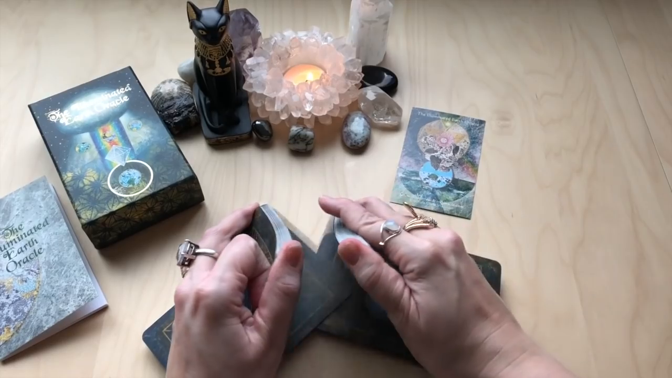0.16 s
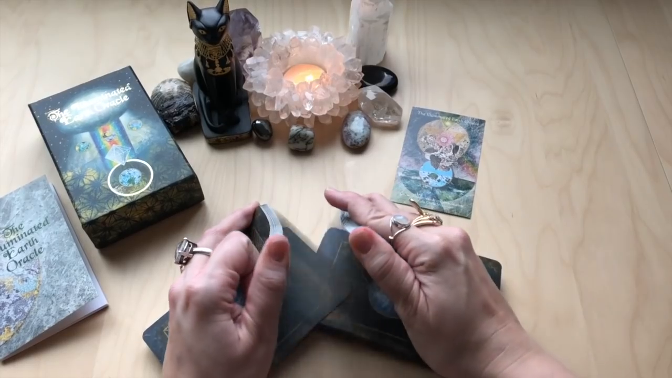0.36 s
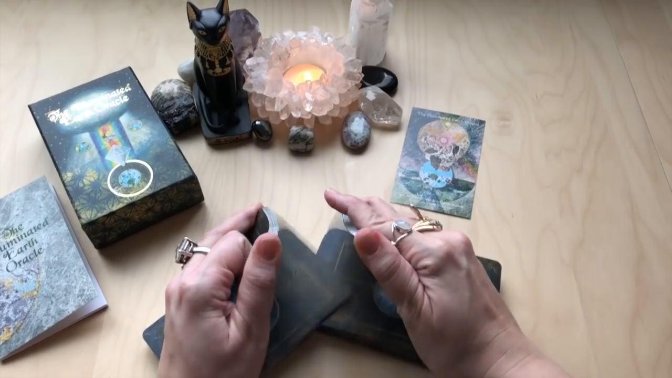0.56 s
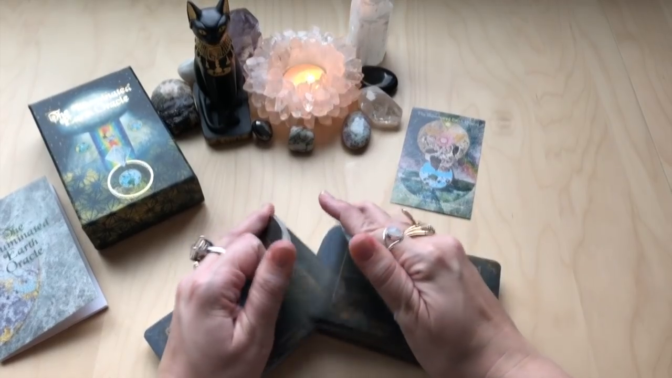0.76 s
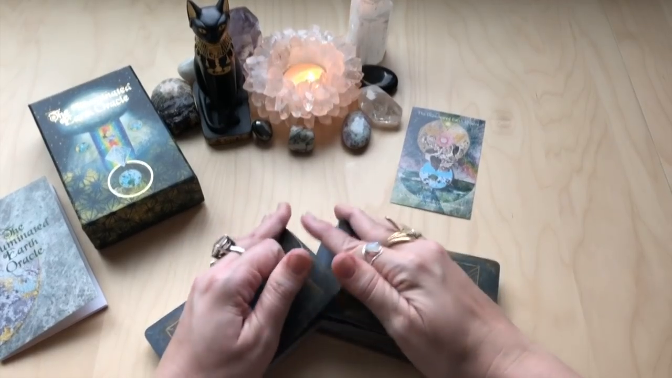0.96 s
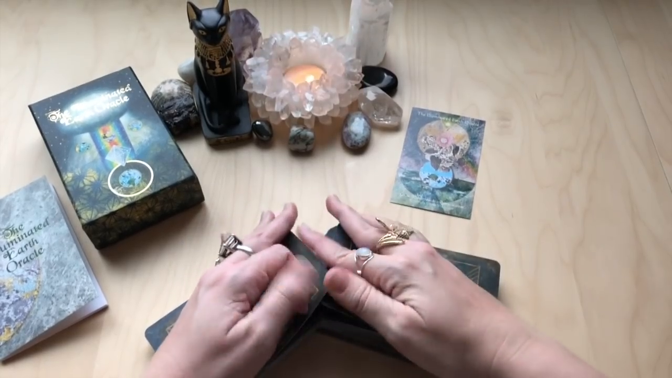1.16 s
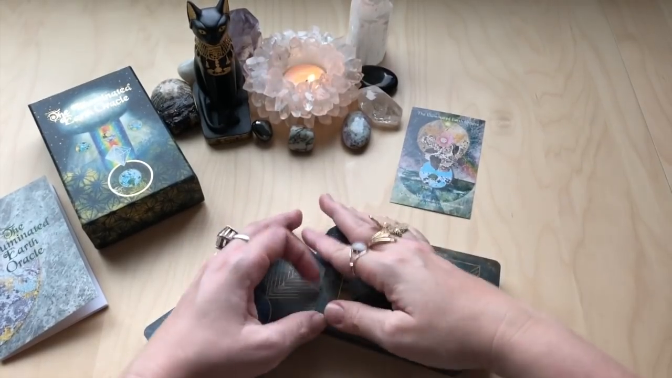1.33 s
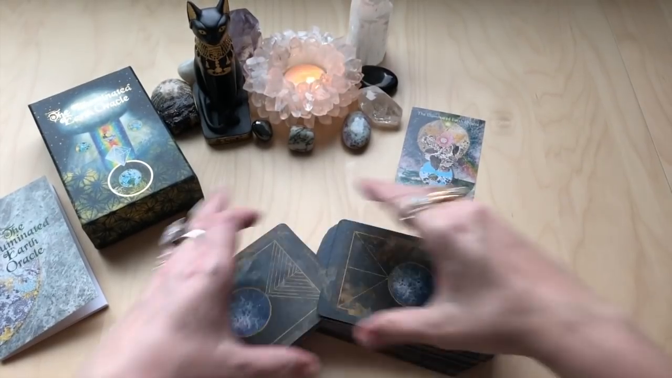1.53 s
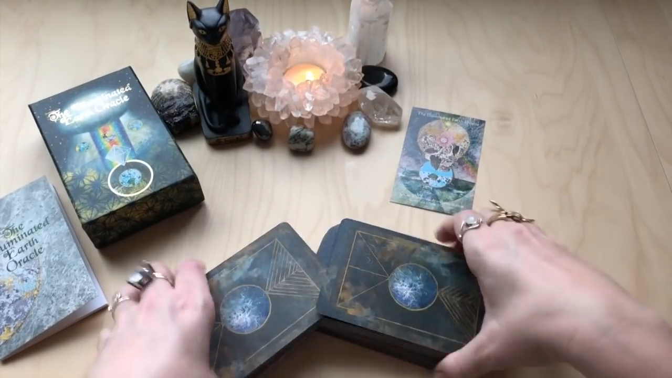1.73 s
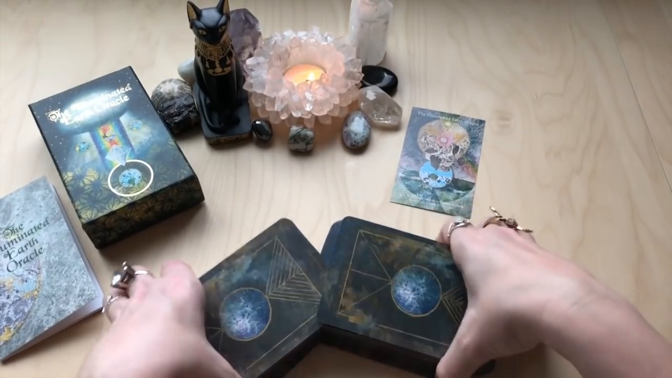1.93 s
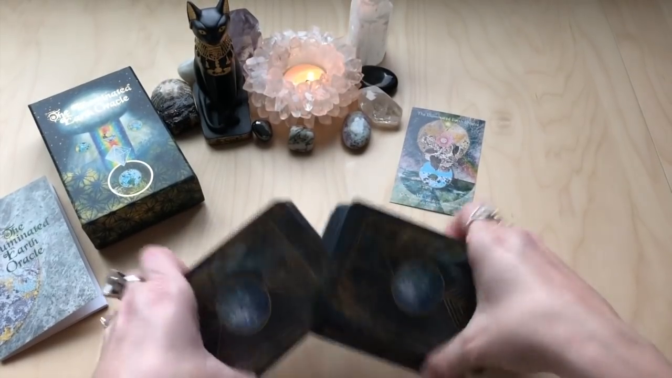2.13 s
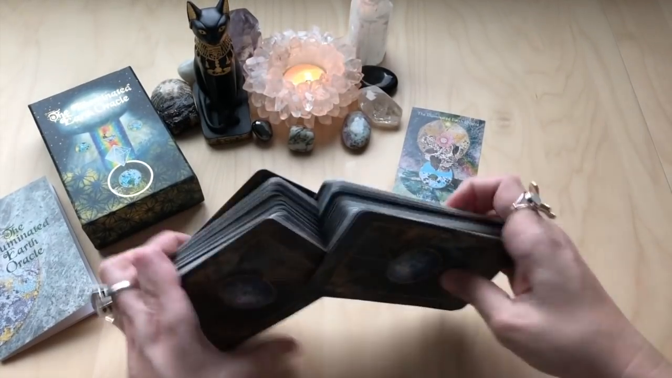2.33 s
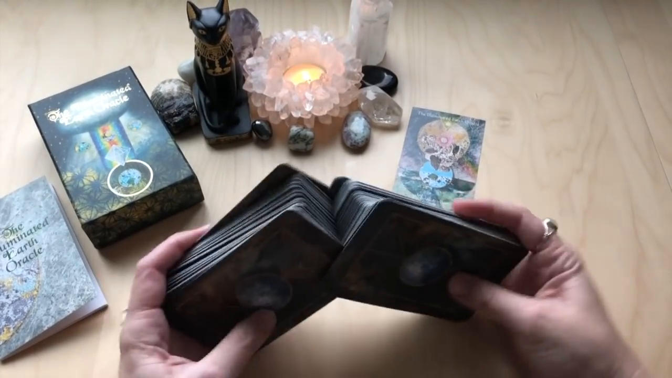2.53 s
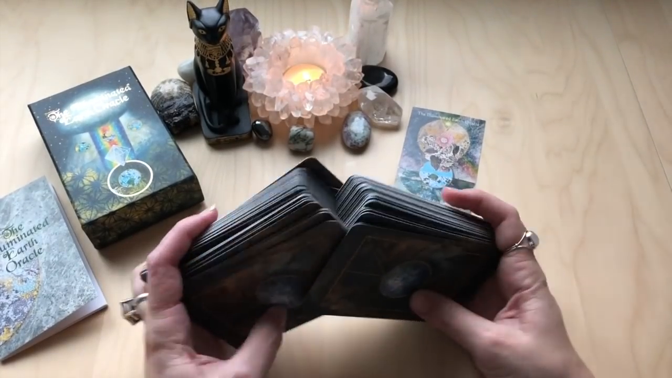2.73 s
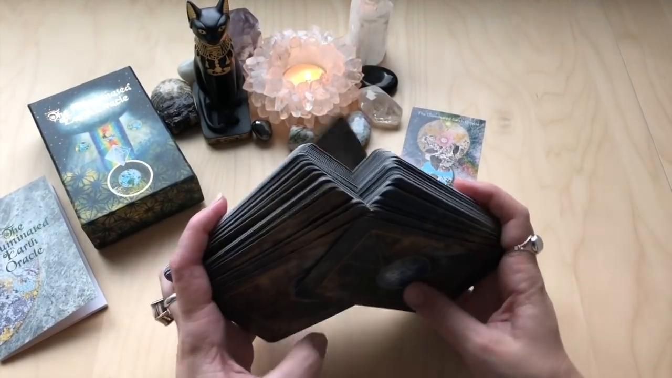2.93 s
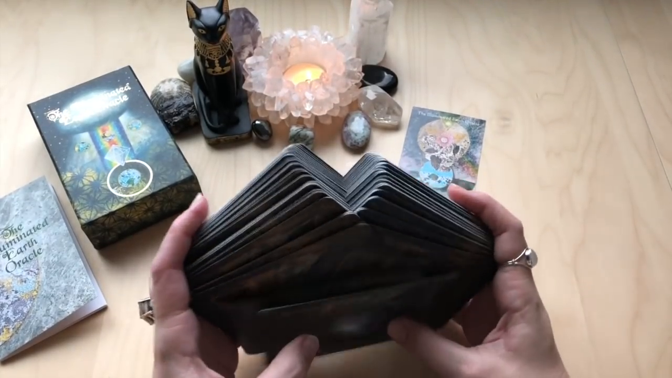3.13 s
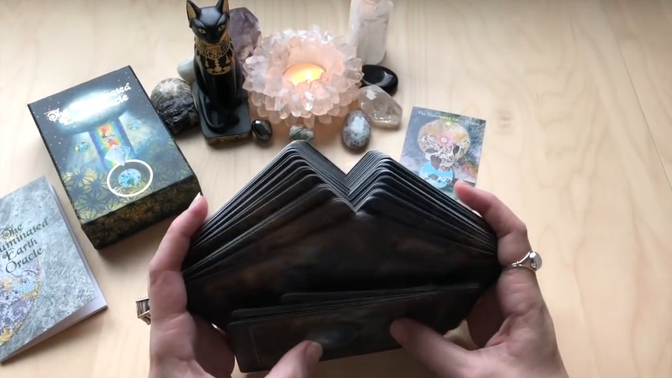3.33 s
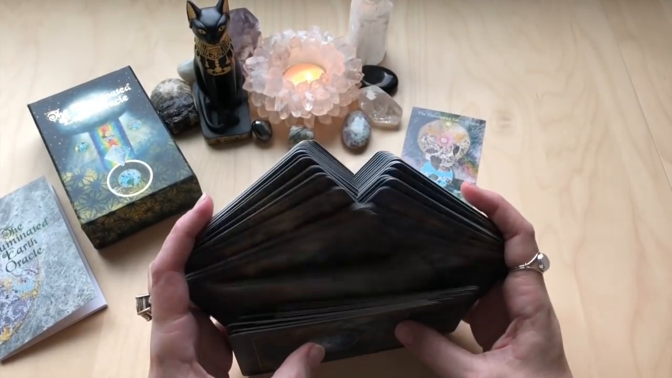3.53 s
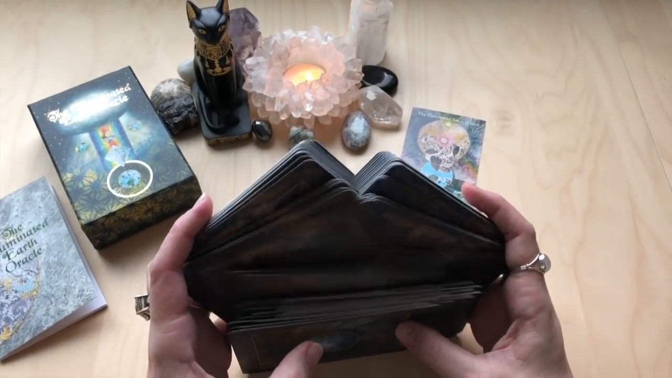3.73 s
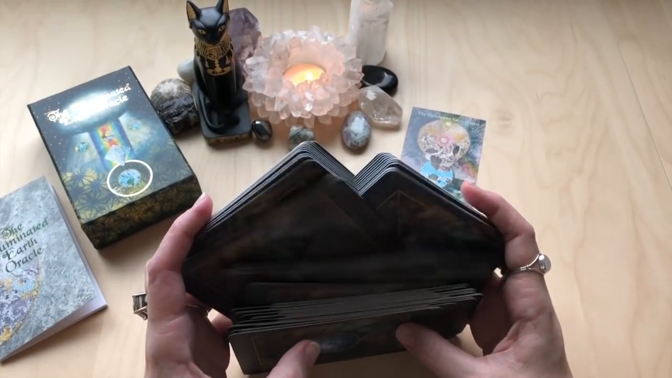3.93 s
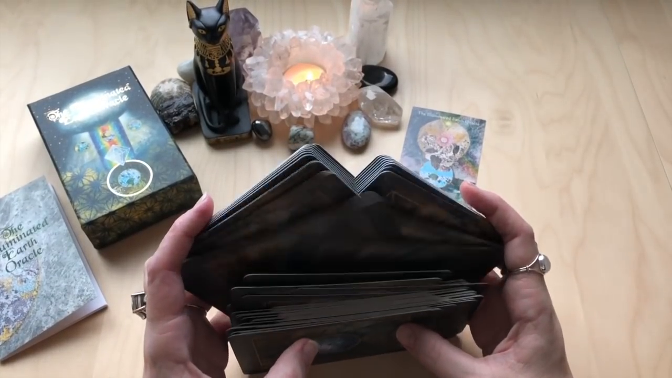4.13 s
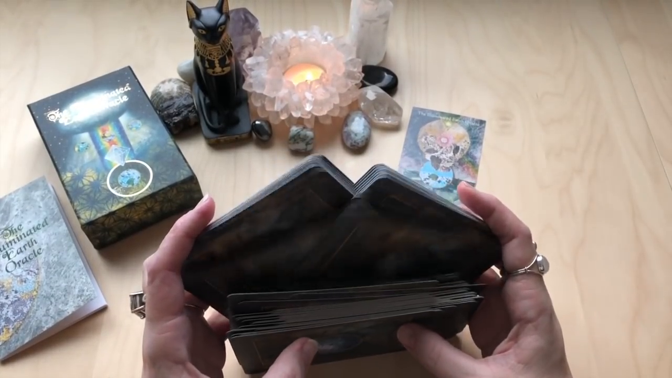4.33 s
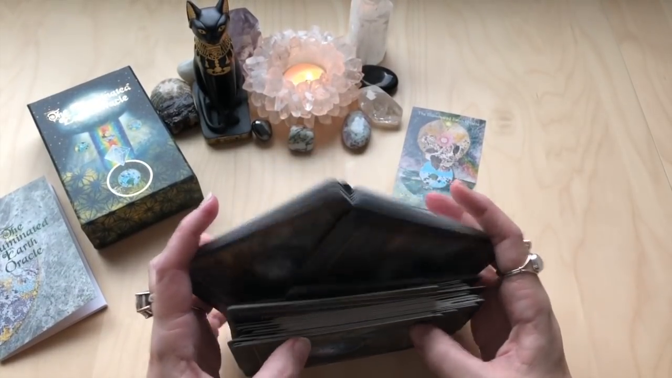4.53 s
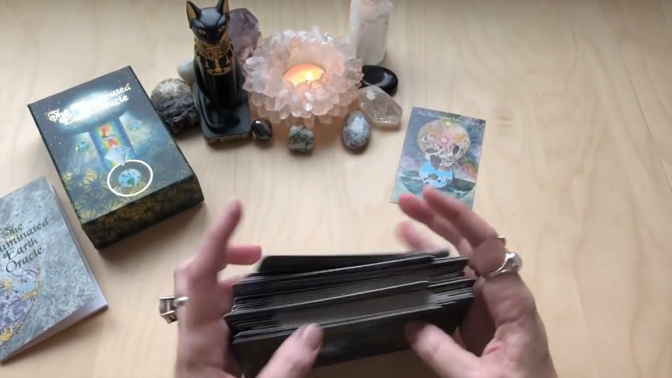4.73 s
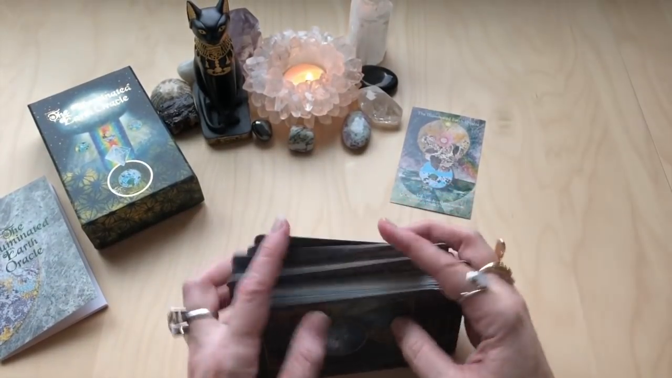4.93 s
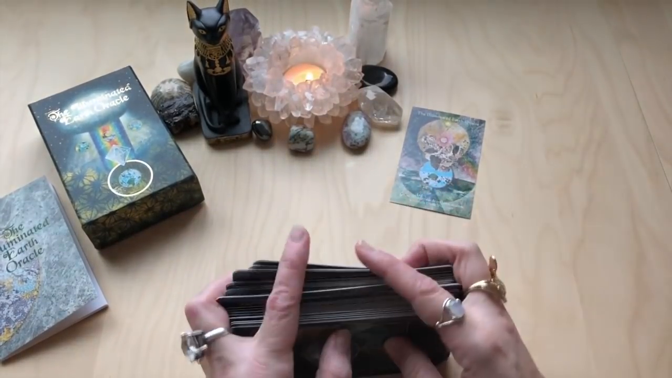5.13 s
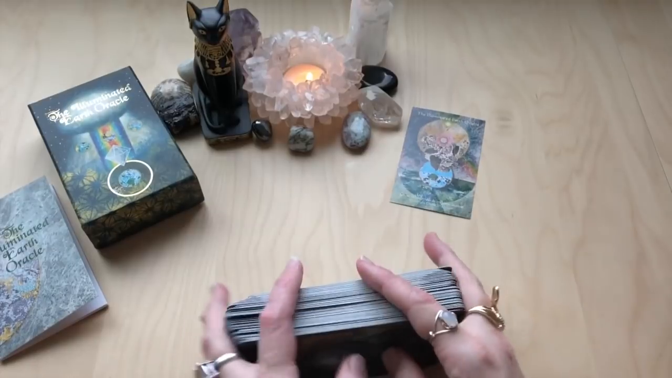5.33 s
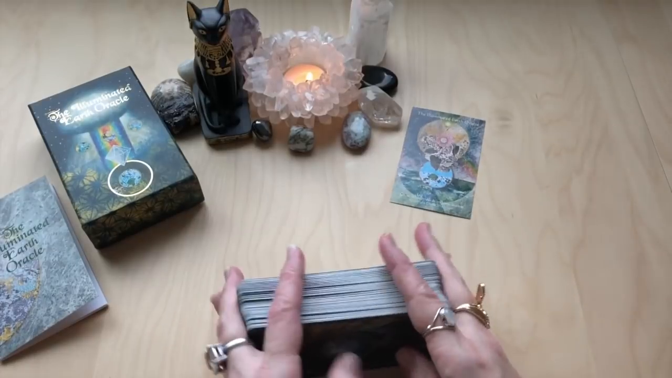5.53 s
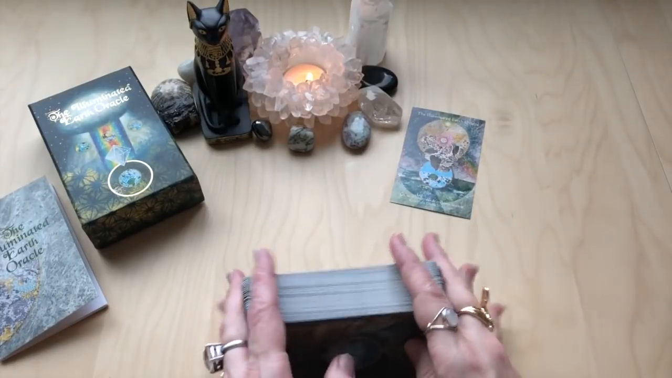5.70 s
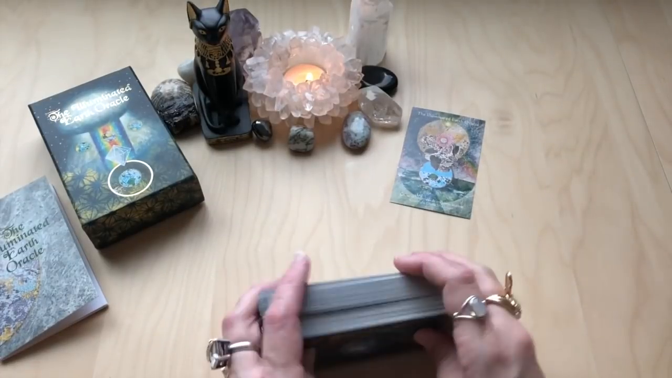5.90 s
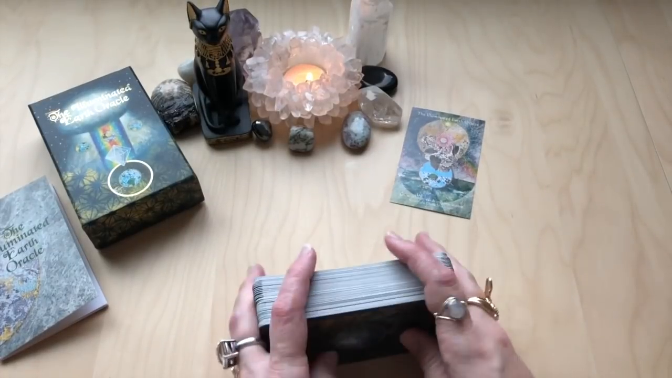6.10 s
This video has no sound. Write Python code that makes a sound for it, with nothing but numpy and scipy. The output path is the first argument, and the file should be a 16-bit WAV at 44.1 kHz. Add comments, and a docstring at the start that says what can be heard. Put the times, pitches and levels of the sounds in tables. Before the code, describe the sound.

Heard close in a quiet room, thumbs riffle two halves of a stiff card deck on a wooden table, a rapid crackle of sharp snaps growing louder and brighter. It stops; faint taps and one dull thump follow. Then the bent cards cascade together in a looser, duller flutter of slaps with rubbing slides, a few last slaps, soft scuffs as the deck is squared, and a final tap.

```python
"""Riffling a deck of cards

In a quiet room, heard from close by, the thumbs riffle two halves of a stiff deck together on a wooden table.
The hands lift the pack, the cards cascade and slap into place, and the deck is squared.
Each card edge cracks for a few milliseconds: short noise bursts ring through card and table resonances.
Longer shaped noise makes the hiss of sliding faces and the rumble of the table, and the room rings on."""
import sys
import numpy as np
from scipy import signal
from scipy.fft import rfft, irfft
from scipy.io import wavfile
from scipy.ndimage import uniform_filter1d

SR = 44100
rng = np.random.default_rng(int(sys.argv[2]) if len(sys.argv) > 2 else 0)


def transcribe(u):
    """Save the signal u as a 16-bit wav file named by the first command-line argument.

    u: samples, shape (n,) or (channels, n), limited to [-1, 1]; the rate is SR.
    q: integer samples, one column per channel.
    """
    v = np.clip(np.atleast_2d(u).T, -1, 1)
    q = np.round(v * 32767).astype(np.int16)
    wavfile.write(sys.argv[1], SR, q)


N = 271656  # length of the scene in samples

# Quiet room noise: f/Hz, relative level/dB per Hz
AIR_SPECTRUM = [(18, -27.5), (30, -32), (59, 4), (108, -2.5), (120, 2.5), (208, -10.5), (243, -16.5),
                (341, 1), (467, -19), (505, -3.5), (691, -21), (15500, -60.5)]
# Faint hum: f/Hz, width/Hz, level/dB
HUM_BAND = (243, 13, -69)
# Low rumble of the table top, swelling with handling and booming after knocks:
# t/s, level/dB (before the rumble's own 4.5 dB cut)
RUMBLE_CURVE = [(0, -52), (.93, -37.5), (1.4, -65.5), (1.73, -78), (1.78, -52), (2.39, -69.5), (2.43, -45),
                (2.65, -56.5), (3.15, -68.5), (3.8, -49.5), (4.37, -73), (4.8, -46.5), (5.15, -63),
                (5.28, -51.5), (6.02, -57.5), (6.11, -43)]
# Card faces and fingers sliding: t/s, hiss level/dB, rub level/dB
SLIDE_CURVE = [(0, -54, -54), (.08, -78, -76), (.29, -57.5, -61.5), (1.1, -58, -58), (1.24, -66, -70),
               (1.47, -76.5, -80.5), (1.74, -89.5, -89.5), (1.8, -72, -76), (2.08, -79, -72),
               (2.68, -70, -72), (3.0, -77, -82), (3.36, -56, -46.5), (3.77, -52.5, -44.5),
               (4.05, -57.5, -51.5), (4.38, -60.5, -70), (4.63, -56.5, -46.5), (5.15, -74.5, -60.5),
               (5.35, -70, -62), (5.7, -76, -66), (6.02, -78, -74), (6.16, -64, -57)]
# Single quick slides: middle t/s, length/s, level/dB before the texture loss,
# texture (-1 table rumble, 0 dull rub, 1 scrape, 2 glossy hiss)
QUICK_SLIDES = [(1.311, 0.023, -47, 2), (1.84, 0.04, -58, 1.5), (1.96, .05, -67, 1.4),
                (2.281, .1, -63.5, 2.2), (2.665, 0.09, -63, 2.1), (2.76, .07, -66, 1.1),
                (2.873, 0.11, -58, 2), (3.07, .04, -72, 1.9), (3.432, 0.037, -35, 0.2),
                (3.933, 0.023, -48, 1), (3.985, 0.04, -51, 1.9), (4.296, 0.1, -52, 2.8),
                (4.432, .045, -40, .6), (4.534, 0.011, -48, 2.1), (4.716, 0.12, -48, 2),
                (5.041, 0.043, -55, 0.8), (5.28, 0.08, -42, 0.1), (5.463, 0.1, -52, 2),
                (5.57, .07, -70, 1.3), (5.225, .04, -52, .1), (5.7, 0.08, -51, -.4),
                (5.812, 0.08, -50, -.1), (5.948, 0.05, -53, 1.5)]
# Card corners snapping off the thumbs: t/s, level/dB, brightness/dB (edge treble over crack)
THUMB_SNAPS = [(0.008, -36, 0), (0.035, -46, 6), (0.076, -46.5, 3), (0.1095, -40, -2), (0.1177, -37, 11),
               (0.1436, -34, -2), (0.1549, -34, 5), (0.176, -41, -1), (0.1947, -34, 11),
               (0.2114, -31, -0.5), (0.2561, -20.5, 1.5), (0.271, -35, 9.5), (0.3008, -42, 14),
               (0.3111, -34, 3), (0.3536, -44, 8), (0.3649, -31.5, 9), (0.37, -37, 0), (0.3984, -32.5, 6.5),
               (0.4023, -29, 8), (0.4186, -37, 7), (0.447, -26.5, 15), (0.4587, -34.5, 6),
               (0.4805, -25.5, 15), (0.4863, -31, 10), (0.5212, -23, 23.5), (0.5309, -29, 11),
               (0.5565, -26, 14), (0.5729, -23, 2), (0.6181, -29.5, 3), (0.6277, -26, 9.5), (0.653, -29, 8),
               (0.659, -27, 10.5), (0.7134, -25.5, 18), (0.7474, -30.5, -7), (0.7535, -25, 28),
               (0.7695, -31.5, 5), (0.7846, -25.5, 6), (0.794, -28, 13.5), (0.8129, -22, 3),
               (0.845, -24.5, 19), (0.862, -23, 2), (0.8664, -25.5, 2.5), (0.885, -34, 14),
               (0.9066, -26, -1), (0.9191, -24.5, -1), (0.9492, -25.5, 1), (0.9634, -22.5, 5.5),
               (1.0087, -26, -6), (1.02, -37, 4), (1.0306, -19.5, 5), (1.062, -25.5, 2), (1.101, -40, -8),
               (1.1062, -26.5, -2.5), (1.152, -23, 3.5), (1.1651, -31.5, 6), (1.1731, -24, 6.5),
               (1.296, -33, 22), (1.476, -62, -4), (1.49, -64, -6)]
# Stretches of small stray card ticks: from t/s, to t/s, ticks per second, lowest level/dB
STRAY_TICKS = [(0.097, 1.19, 72, -48.5), (3.251, 3.98, 87.3, -40), (4.58, 4.87, 80, -45)]
# Dull card-body thuds, some alone and some beneath a snap or slap: t/s, card body level/dB
DULL_THUDS = [(0.128, -40.5), (0.1549, -39), (0.1949, -38), (0.251, -42), (0.3009, -39.5), (0.3538, -38.5),
              (0.4715, -38), (0.491, -42), (0.614, -41), (0.643, -39), (0.722, -41), (0.851, -35),
              (0.996, -38), (0.516, -40), (0.5732, -31.5), (0.657, -36), (0.6883, -38), (0.7474, -37.5),
              (0.807, -34.5), (0.8348, -39), (1.019, -36), (1.137, -33.5), (1.152, -30.5), (1.1729, -32.5),
              (3.105, -53), (3.462, -36), (3.816, -25.5), (3.928, -29), (4.0463, -33), (4.0899, -23.5),
              (4.5945, -32.5), (4.8318, -34), (4.948, -36), (4.967, -36.5), (5.16, -54), (5.206, -35.5),
              (5.27, -40)]
# Pack and hands knocking the table: t/s, card body level/dB, crack level/dB, edge treble level/dB,
# table level/dB, contact time/s (halved for the edge)
TABLE_KNOCKS = [(1.745, -65, -66.5, -69, -58.5, 0.0051), (1.76, -59.5, -57.5, -63.5, -49, 0.0042),
                (1.782, -66, -57, -64, -60, 0.004), (1.876, -59, -57, -64, -44.5, 0.0027),
                (1.925, -48, -49, -51, -38, 0.0067), (2.046, -66, -62, -66, -62, 0.003),
                (2.155, -57.5, -56, -61, -61, 0.0044), (2.172, -59, -60, -66, -64, 0.004),
                (2.416, -33.5, -48.5, -50, -37, 0.011), (2.487, -41, -62, -52.5, -47.5, 0.0047),
                (2.623, -55, -56.5, -53.5, -54, 0.0064), (6.064, -44, -59, -64, -45, 0.025),
                (6.087, -29, -23, -35.5, -55, 0.011)]
# Cards slapping onto the pile: t/s, level/dB, brightness/dB (edge treble over crack)
PILE_SLAPS = [(3.1675, -49.5, -3), (3.1935, -24, -8), (3.2476, -22, -5), (3.3036, -32, -15),
              (3.3144, -24, -6), (3.3588, -25.5, -12), (3.3908, -20.5, -1.5), (3.4232, -25, -8),
              (3.4492, -30, -10), (3.486, -25, -20), (3.4961, -29.5, -3), (3.509, -27.5, -6.5),
              (3.5502, -30, -12), (3.5835, -32.5, -14), (3.6127, -19.5, -2.5), (3.6741, -30, -7),
              (3.6908, -24, -9), (3.7336, -26.5, -11), (3.752, -30.5, -17), (3.784, -22.5, -7),
              (3.8045, -17, -3), (3.816, -21, 2), (3.8655, -29.5, -12), (3.8724, -30, -9), (3.9102, -27, 0),
              (3.966, -38, -10), (4.061, -43, -14), (4.0901, -23, 4), (4.1795, -29.5, -13),
              (4.4014, -27, -14), (4.4066, -31, -10), (4.4408, -34, -18), (4.5154, -42, -6),
              (4.5818, -34.5, -21), (4.6255, -21.5, -2.5), (4.6326, -28.5, -21), (4.6785, -39, -6),
              (4.7079, -26.5, -9), (4.7408, -28, -4), (4.7523, -33.5, -14), (4.7795, -30, -22),
              (4.8095, -31, -18), (4.9261, -36, -17), (4.9585, -39.5, -19), (5.2108, -46, -15),
              (5.2611, -30, -14), (5.2805, -28.5, -7), (6.098, -32, -8), (6.1212, -40, -9)]
# Resonances of the table top: f/Hz, width/Hz, relative level/dB
TABLE_MODES = [(126.7, 9.3, -0.5), (273.4, 73, -0.5), (782, 160, -10.5), (442.7, 28, -5.5), (83, 61, -5)]
# Resonances of the card body: f/Hz, width/Hz, relative level/dB
CARD_MODES = [(650, 560, -4), (1100, 272, 5), (1750, 1130, -1.5)]
# Resonances of the bright crack: f/Hz, width/Hz, relative level/dB
CRACK_MODES = [(2590, 1530, 1), (3770, 1730, 2), (5830, 1620, -4.5)]
# Resonances of the card edge, the highest treble: f/Hz, width/Hz, relative level/dB
EDGE_MODES = [(6800, 2500, 0.5), (10200, 1700, 4), (15660, 8500, -1.5)]
# Ringing of the room: f/Hz, time to fall 60 dB/s, level/dB
ROOM_BANDS = [(185, 0.28, -19), (680, 0.35, -15.5), (1920, 0.37, -12), (4170, 0.22, -17.5),
              (11000, 0.093, -9.5)]

AIR_DB = -71
ROLL_OFF_HZ, TOP_HZ = 15650, 16990  # where the treble rolls off, and where it ends
TEXTURE_STEP_DB = 9.0  # loss of a slide layer one step from the texture; grows with the square
SWISH_EDGE = 3.0  # 2 = soft swell, higher = flatter top and quicker ends
SLAP_S, DULL_S_PER_DB = 0.002, 0.00012  # contact time; duller slaps close more slowly
SNAP_BODY_DB, SLAP_BODY_DB = -7.5, -6.5  # card body relative to the crack
THUD_CRACK_DB, THUD_EDGE_DB, THUD_TABLE_DB = -12.5, -23, -9  # relative to the card body
CUPPED_UNTIL_S, CUPPED_DB = 1.25, -5.5  # hands over the riffle keep sound from the walls
ECHO_TURN_S = 0.06  # time before the next echo takes over


def undb(db):
    """Turn decibels into a plain multiplier."""
    return 10 ** (np.asarray(db) / 20)


def level(x, db):
    """Scale a sound so that its rms level is db."""
    return x * undb(db) / np.sqrt(np.mean(x ** 2))


def ring(x, modes, dark_above_hz=None):
    """Add up resonances, dull above dark_above_hz, scaled so that white noise keeps its level."""
    def through(v):
        total = 0
        for k, (hz, width_hz, db) in enumerate(modes):
            b, a = signal.iirpeak(hz, hz / width_hz, SR)
            # every other resonance is flipped in sign
            total = total + (-1) ** k * undb(db) * signal.lfilter(b, a, v)
        if dark_above_hz:
            total = signal.sosfilt(signal.butter(4, dark_above_hz, fs=SR, output="sos"), total)
        return total

    energy = np.sum(through(signal.unit_impulse(4096)) ** 2)
    return through(x) / np.sqrt(energy)


def curve(table, column):
    """Join the points of a table column with straight lines over time."""
    rows = np.array(table)
    return np.interp(np.arange(N) / SR, rows[:, 0], rows[:, column])


def walk(rate):
    """Glide between random levels, a new one every 1 / rate seconds; spread near 1."""
    hold = int(SR / rate)
    steps = np.repeat(rng.standard_normal(N // hold + 1), hold)
    return 1.2 * uniform_filter1d(steps, hold)[:N]


def split(table):
    """Give the level to the louder of crack and edge; the brightness sets the other below it."""
    s, db, bright_db = np.transpose(table)
    crack_db = db - np.maximum(bright_db, 0)
    edge_db = db + np.minimum(bright_db, 0)
    return s, crack_db, edge_db


def bursts(times, db, contact_s, fade_s, rise_s, tick):
    """A tick at first touch and noise while the contact closes, dying quickly; db is the noise rms."""
    out = np.zeros(N + 2048)
    t = np.arange(2048) / SR
    for s, burst_db, closing_s in np.broadcast(times, db, contact_s):
        env = np.minimum(t / rise_s, 1) * np.exp(-np.maximum(t - closing_s, 0) / fade_s)
        noise = env * rng.standard_normal(len(t))
        noise *= np.sqrt(np.sum(env ** 2) / np.sum(noise ** 2))
        noise[int(rise_s * SR)] += tick
        start = int(s * SR)
        out[start:start + len(t)] += undb(burst_db) * noise
    return out[:N]


def contacts(s, crack_db, edge_db, body_db, table_db, contact_s, fade_s, rise_s, tick, edge_hz):
    """One blow feeds four ranges; the edge fades first, card body and table last."""
    crack = bursts(s, crack_db, contact_s, fade_s, rise_s, tick)
    edge = bursts(s, edge_db, 0.5 * contact_s, 0.63 * fade_s, rise_s, tick)
    body = bursts(s, body_db, contact_s, 1.62 * fade_s, rise_s, tick)
    table = bursts(s, table_db, contact_s, 2.13 * fade_s, rise_s, tick)
    return (ring(crack, CRACK_MODES, dark_above_hz=7200)
            + ring(edge, EDGE_MODES, dark_above_hz=edge_hz)
            + ring(body, CARD_MODES, dark_above_hz=2730)
            + ring(table, TABLE_MODES, dark_above_hz=1200))


def swells(layer):
    """A smooth rise and fall for each quick slide, strongest in the layer nearest its texture."""
    t = np.arange(N) / SR
    total = 0
    for middle_s, length_s, db, texture in QUICK_SLIDES:
        layer_db = db - TEXTURE_STEP_DB * (layer - texture) ** 2
        total = total + undb(layer_db) * np.exp(-np.abs(2 * (t - middle_s) / length_s) ** SWISH_EDGE)
    return total


def air():
    """Quiet room noise with a faint hum, which wavers because it is noise in a narrow band."""
    hz, db = np.transpose(AIR_SPECTRUM)
    log_hz = np.log(np.fft.rfftfreq(N, 1 / SR) + 1)  # + 1 avoids the log of zero
    gain = undb(np.interp(log_hz, np.log(hz), db))
    noise = irfft(rfft(rng.standard_normal(N)) * gain, N)
    hum_hz, hum_width_hz, hum_db = HUM_BAND
    hum = ring(rng.standard_normal(N), [(hum_hz, hum_width_hz, 0)])
    return level(noise, AIR_DB) + level(hum, hum_db)


def table_rumble():
    """Uneven noise rings the table top, swelling with handling and booming after knocks."""
    uneven = undb(2.5 * walk(40))
    rumble = level(ring(rng.standard_normal(N) * uneven, TABLE_MODES), -4.5)
    return rumble * (undb(curve(RUMBLE_CURVE, 1)) + swells(layer=-1))


def slide():
    """Glossy faces hiss smoothly over each other; fingers rub dully and edges scrape."""
    grit = rng.standard_normal(N) * undb(1.2 * walk(200))
    hiss = level(ring(grit, EDGE_MODES), 0) + level(ring(grit, CRACK_MODES), -5.0)
    drag = rng.standard_normal(N) * undb(1.5 * walk(80))
    rub = level(ring(drag, CARD_MODES, dark_above_hz=2550), 0)
    scrape = level(ring(drag, CRACK_MODES, dark_above_hz=4860), 0)
    hiss_gain = undb(curve(SLIDE_CURVE, 1))
    rub_gain = undb(curve(SLIDE_CURVE, 2))
    return (hiss * (hiss_gain + swells(layer=2))
            + rub * (rub_gain + swells(layer=0))
            + scrape * (undb(-8.0) * rub_gain + swells(layer=1)))


def riffle():
    """Card corners make very short, sharp snaps; each falling card pats the table."""
    s, crack_db, edge_db = split(THUMB_SNAPS)
    body_db = crack_db + SNAP_BODY_DB
    return contacts(s, crack_db, edge_db, body_db, body_db - 7.5, contact_s=0.00041, fade_s=0.0022,
                    rise_s=0.0004, tick=3.5, edge_hz=None)


def tail():
    """Broad bands of noise, each dying at its own rate, rising over the first 2 ms."""
    t = np.arange(SR // 2) / SR
    out = 0
    for hz, t60, db in ROOM_BANDS:
        band = ring(rng.standard_normal(len(t)), [(hz, hz, 0)])
        band = band * 1000 ** (-t / t60) * np.clip(t / 0.002, 0, 1)
        out = out + undb(db) * band / np.sqrt(np.sum(band ** 2))
    return out


def room(x, count=6):
    """Several random echoes take turns, so no single echo's colour stands out."""
    turn = (np.arange(N) / SR / ECHO_TURN_S).astype(int) % count
    return sum(signal.fftconvolve(x * (turn == k), tail())[:N] for k in range(count))


def flutter():
    """Small card ticks at random moments, each with its own size and brightness."""
    out = 0
    for start, end, rate, lowest_db in STRAY_TICKS:
        when, size, tilt = rng.random((100, 3)).T
        s = start + np.cumsum(-np.log(1 - when)) / rate  # random gaps
        tick_db = lowest_db - 2.87 * np.log(1 - size)
        tick_db = np.where(s < end, tick_db, -200)  # silence the ticks past the end
        s = np.minimum(s, end)
        tilt_db = 18.0 * (tilt - 0.5)
        crack_db, edge_db = tick_db - tilt_db, tick_db + tilt_db - 1.5
        out = out + contacts(s, crack_db, edge_db, crack_db - 9.5, tick_db - 4.5, contact_s=0.00019,
                             fade_s=0.0008, rise_s=0.0004, tick=1.5, edge_hz=None)
    return out


def thuds():
    """Dull thuds, mostly card body and table, some alone and some beneath a snap or slap."""
    s, db = np.transpose(DULL_THUDS)
    return contacts(s, db + THUD_CRACK_DB, db + THUD_EDGE_DB, db, db + THUD_TABLE_DB, contact_s=0.0012,
                    fade_s=0.002, rise_s=0.0007, tick=4.0, edge_hz=8400)


def knocks():
    """Knocks of hands and pack on the table, from faint short taps to long dull thumps."""
    s, body_db, crack_db, edge_db, table_db, contact_s = np.transpose(TABLE_KNOCKS)
    return contacts(s, crack_db, edge_db, body_db, table_db, contact_s, fade_s=0.0054,
                    rise_s=0.0015, tick=2.2, edge_hz=12300)


def slaps():
    """Flat card faces close over some milliseconds and shake the table."""
    s, crack_db, edge_db = split(PILE_SLAPS)
    body_db = crack_db + SLAP_BODY_DB
    dullness_db = np.clip(crack_db - edge_db, 0, 30)
    contact_s = SLAP_S + DULL_S_PER_DB * dullness_db
    return contacts(s, crack_db, edge_db, body_db, body_db - 11.0, contact_s, fade_s=0.0023,
                    rise_s=0.001, tick=4.8, edge_hz=11600)


def scene():
    """Add the cards, their echo from the walls, the table rumble and the room noise."""
    cards = slide() + riffle() + flutter() + thuds() + knocks() + slaps()
    to_walls = np.where(np.arange(N) / SR < CUPPED_UNTIL_S, undb(CUPPED_DB), 1)
    return (cards + room(to_walls * cards) + table_rumble() + air())[None]


def record(dry):
    """Thin out the deep bass, roll off the highest treble and end it at TOP_HZ."""
    x = signal.sosfilt(signal.butter(2, 70, "high", fs=SR, output="sos"), dry)
    x = signal.sosfilt(signal.cheby1(10, 1, ROLL_OFF_HZ, fs=SR, output="sos"), x)
    return signal.sosfilt(signal.ellip(10, 0.2, 70, TOP_HZ, fs=SR, output="sos"), x)


dry = scene()
out = record(dry)
transcribe(out)
```